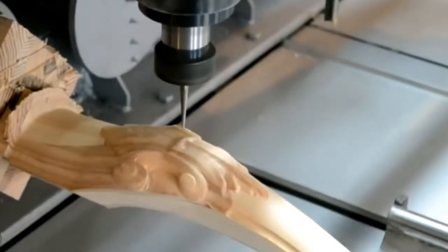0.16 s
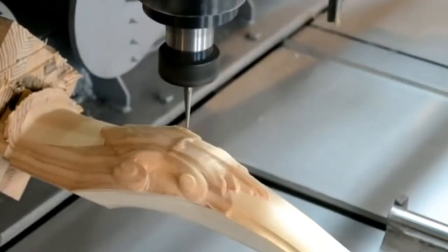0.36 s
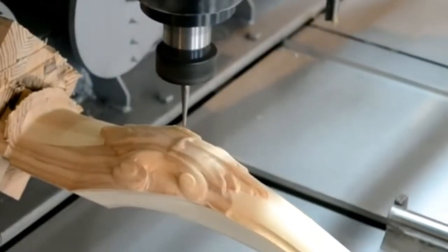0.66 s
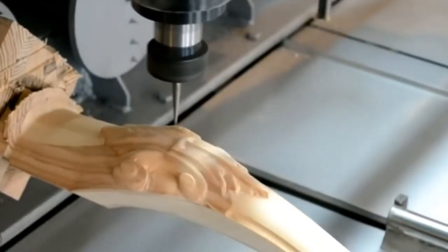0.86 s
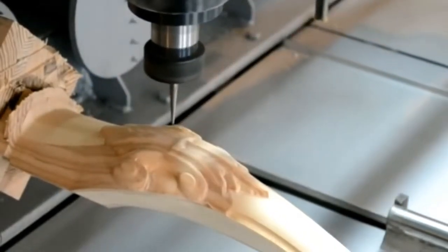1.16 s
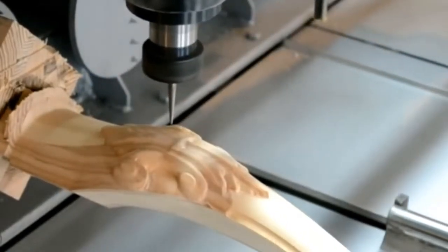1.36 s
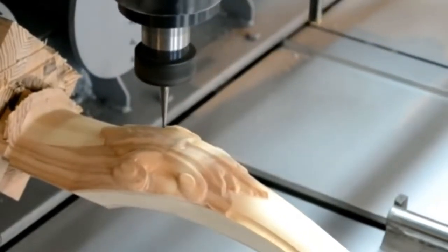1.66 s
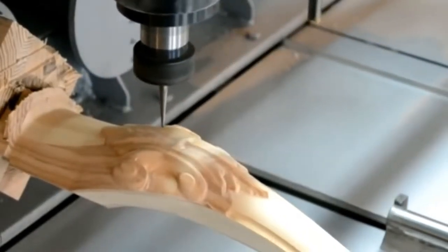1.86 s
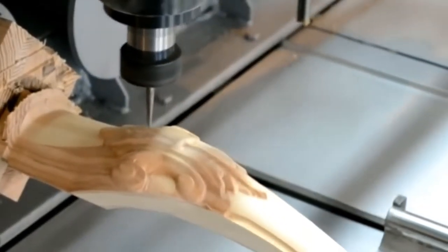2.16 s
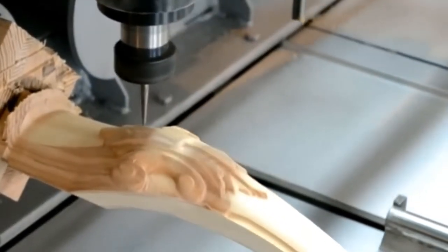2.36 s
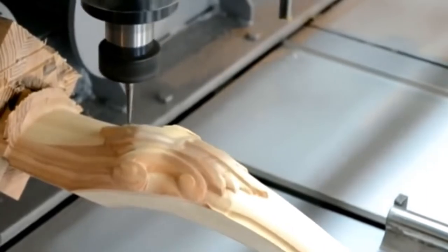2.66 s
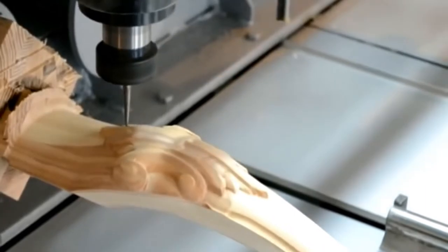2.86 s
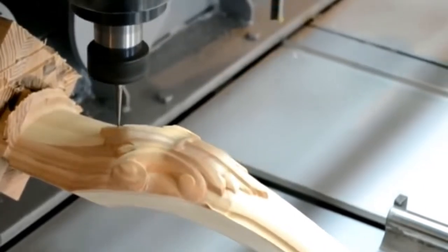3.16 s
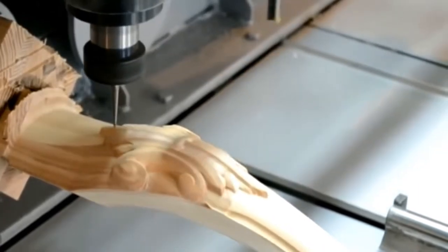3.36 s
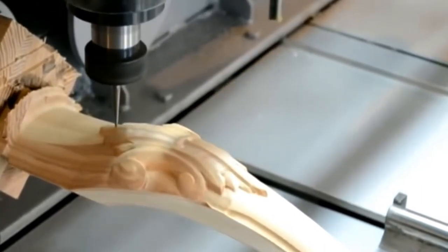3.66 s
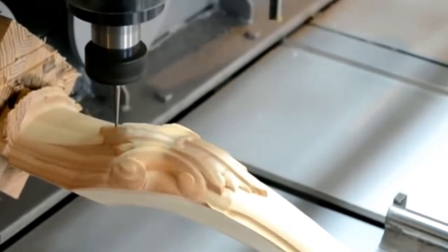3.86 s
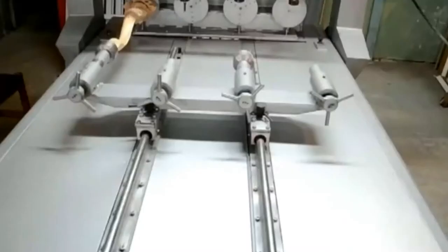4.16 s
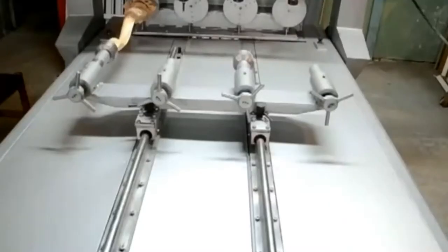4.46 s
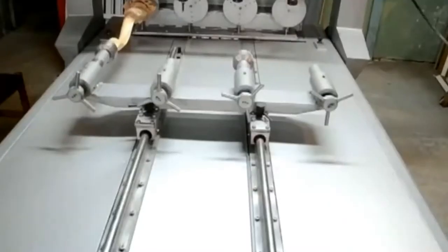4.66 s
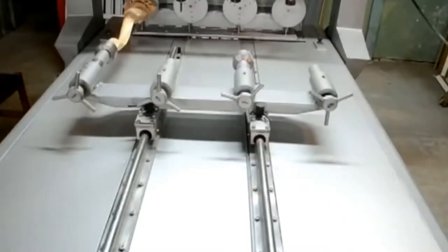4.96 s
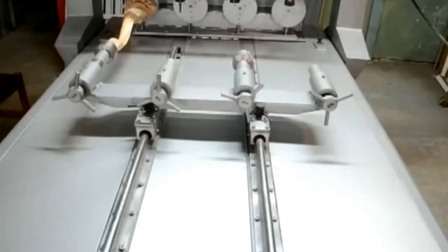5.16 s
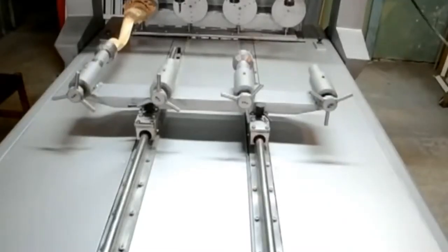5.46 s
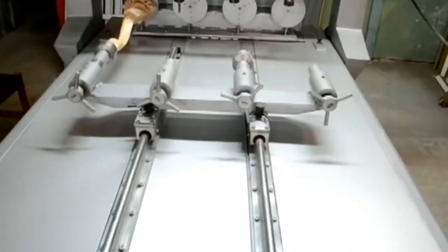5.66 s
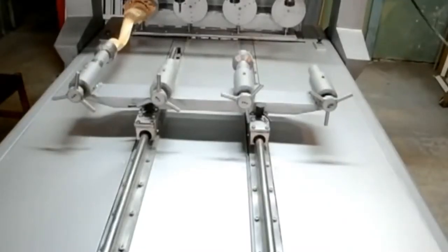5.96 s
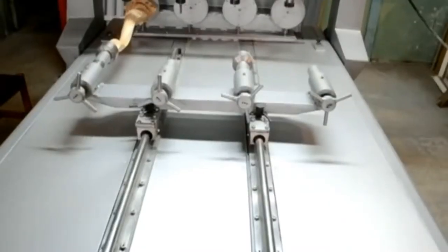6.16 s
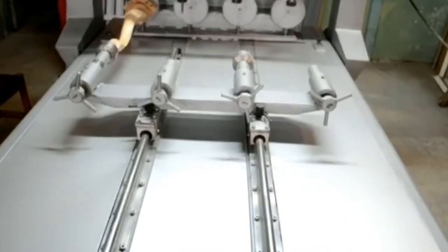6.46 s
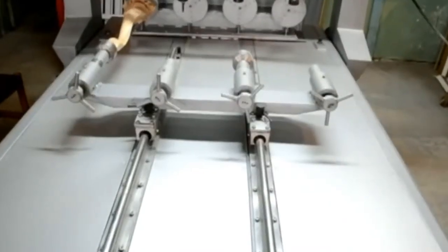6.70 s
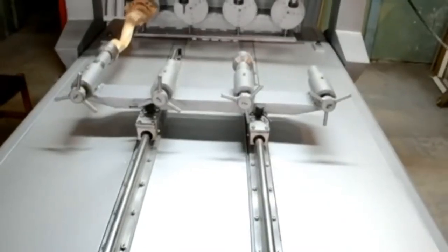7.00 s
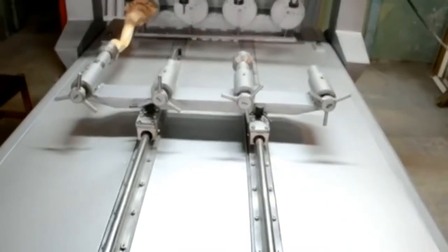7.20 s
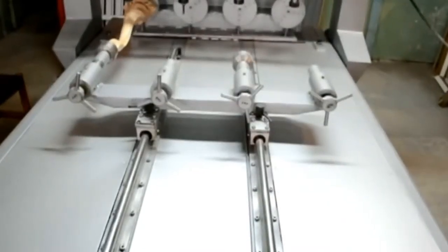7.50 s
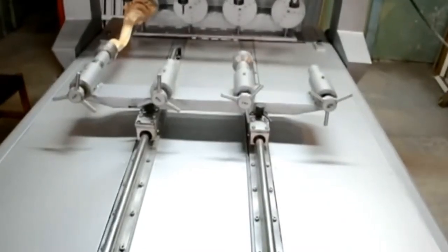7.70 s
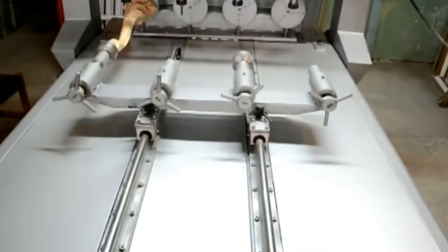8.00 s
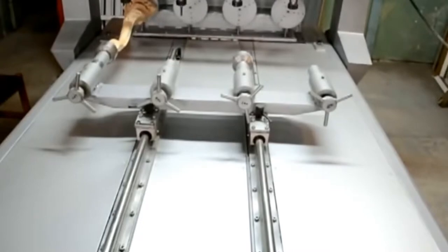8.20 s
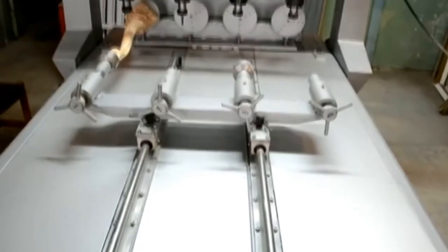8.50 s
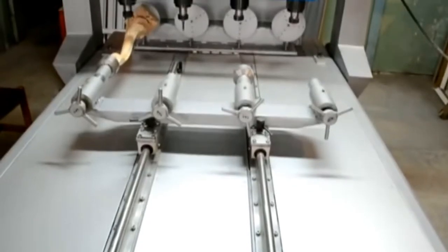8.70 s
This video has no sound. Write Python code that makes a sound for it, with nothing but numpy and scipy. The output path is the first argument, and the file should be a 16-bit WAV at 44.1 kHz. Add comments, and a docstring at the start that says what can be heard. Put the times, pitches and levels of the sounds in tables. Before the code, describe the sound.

A carving spindle whines and hisses steadily close by, cuts to brief silence, then continues duller and farther away before a sharp closing squeal.

```python
"""A carving machine's carriage rumbles and groans, then thuds once: rows of noise bursts, wavering tones, damped modes.
Close by, its spindle turns 299 times a second: sines at multiples of the speed whine and whistle over rushing noise.
From 2.2 s the cutter chatters in short chirps; half a second of silence follows at 4.2 s.
Then from the far end of the table the air is duller and a second spindle beats with the first.
At the end filtered noise spurts as air, and the head comes down with a squeal of throbbing, unsteady tones."""
import sys
import numpy as np
from scipy import signal
from scipy.fft import rfft, irfft, next_fast_len
from scipy.io import wavfile
from scipy.ndimage import uniform_filter1d, map_coordinates

SR = 44100
rng = np.random.default_rng(int(sys.argv[2]) if len(sys.argv) > 2 else 0)


def wav_record(signal):
    """Record a signal, one row per channel, as 16-bit PCM in the file named by sys.argv[1]."""
    frames = np.transpose(np.atleast_2d(signal))
    bounded = np.clip(frames, -1, 1)
    # unit amplitude maps onto the largest positive 16-bit level
    quanta = np.round(bounded * 32767).astype(np.int16)
    wavfile.write(sys.argv[1], SR, quanta)


N = 389844
TIME = np.arange(N) / SR  # s

# Turbulent air close by: f/Hz, relative spectral level/dB (per Hz)
NEAR_AIR_SPECTRUM = [(25, -47.5), (70, -31), (110, -28.5), (160, -24), (300, -16.5), (500, -14.5),
                     (1000, -6), (1600, 1), (2600, -2.5), (4300, -7), (6500, -7), (9000, -6),
                     (10400, -11.5), (15000, -36.5)]
# Resonances of housing and table, close by: f/Hz, width/Hz, lift/dB
NEAR_RESONANCES = [(530.5, 42, 10), (704.5, 270, 14), (1219, 82, 11), (1424, 188, 7.5), (1690, 28, 8),
                   (2118, 150, 5.5), (2544, 180, 4.5), (2740, 61, 5), (3080, 43, 5), (3190, 69, 6.5),
                   (3820, 450, 5), (4330, 26, 3.5), (5030, 350, 5.5), (5900, 60, 5.5)]
# Hum close by, as the head crosses the work: t/s, level/dB
NEAR_HUM_LEVEL = [(0, -32), (1.5, -27), (2.4, -27.5), (4.19, -31.5)]
# Fan whine close by: t/s, level/dB
NEAR_FAN_LEVEL = [(0.03, -19.5), (1.46, -17.5), (2.28, -21), (3.35, -16.5), (3.43, -17.5), (4.15, -18)]
# Other motors close by: beat f/Hz, t of a crest/s, level relative to the spindle's hum/dB
NEAR_MOTORS = [(1.156, 2.276, -11), (1.783, 2.286, -17.8)]


def spindle_near(turns, field):
    """Superposition beside the cutter: resonant air noise plus tones locked to rotor and field."""
    (hum_db,), (fan_db,) = curves(NEAR_HUM_LEVEL), curves(NEAR_FAN_LEVEL)
    # The rush fades by 0.24 dB/s as the head moves off
    air_db = -16 - 0.24 * TIME + 0.15 * wobble(7.3)
    out = amp(air_db) * air(turns, NEAR_AIR_SPECTRUM, NEAR_RESONANCES, chop=0.035, patchy_db=1.65)
    out += amp(hum_db) * hum(turns, NEAR_MOTORS, waver_db=0.5)
    out += whine(turns, fan_db, octave_db=-29.5, rough_db=0.76, smear=0.002, octave_rough_db=3.5)
    out += shaft_tones(turns, is_far=False, waver_db=1.8)
    return out + whistles_near(field)


# Turbulent air from afar: f/Hz, relative spectral level/dB (per Hz)
FAR_AIR_SPECTRUM = [(25, -44), (60, -34), (110, -28), (160, -21), (300, -13), (500, -9.5), (1000, -3.5),
                    (1600, 0.5), (2600, -2), (4300, -8.5), (6500, -11.5), (9000, -13), (10400, -17),
                    (15000, -44)]
# Resonances of housing and table, from afar: f/Hz, width/Hz, lift/dB
FAR_RESONANCES = [(711, 122, 8.5), (1190, 30, 2), (1440, 250, 7.5), (1994, 125, 5.8), (2600, 250, 4.3),
                  (3110, 92, 8.2), (3800, 130, 1.9), (4073, 55, 9.5), (4540, 87, 6.8), (7300, 47, 3.7)]
# Brief swells of the rush: start t/s, end t/s, added gain relative to the steady rush/dB
AIR_SWELLS = [(5.93, 6.0, -10), (8.2, 8.43, -13)]
# Fan whines from afar, before the closing drop: t/s, own fan level/dB, second spindle's fan level/dB
FAR_FAN_LEVELS = [(4.7, -38.2, -37.3), (5.2, -29.0, -34.4), (5.7, -38.4, -37.9), (6.3, -33.6, -35.3),
                  (7.0, -31.1, -28.7), (7.45, -23.5, -28.4), (8.05, -21.6, -27.8), (8.3, -22.8, -34.6),
                  (8.55, -18.6, -33.6)]
# Other motors from afar: beat f/Hz, t of a crest/s, level relative to the spindle's hum/dB
FAR_MOTORS = [(1.044, 7.158, -6.5), (1.666, 6.853, -12.5)]


def spindle_far(turns, field):
    """Superposition from afar: duller air and two beating fans, turned down 4.8 dB under the closing squeal."""
    fan_db, second_db = curves(FAR_FAN_LEVELS)
    flow = amp(-19) * (1 + bursts(AIR_SWELLS, attack_s=0.027, fall_db_per_s=134))
    out = flow * air(turns, FAR_AIR_SPECTRUM, FAR_RESONANCES, chop=0.025, patchy_db=1.7)
    out += amp(-36.5) * hum(turns, FAR_MOTORS, waver_db=1.3)
    out += whine(turns, fan_db, octave_db=-32.5, rough_db=1.5, smear=0.0022, octave_rough_db=1.0)
    out += amp(second_db) * second_fan(turns)
    out += shaft_tones(turns, is_far=True, waver_db=1.6)
    out += whistles_far(field)
    drop_start_s, glide_s, drop_db = 8.648, 0.055, -4.8
    return out * amp(drop_db * np.clip((TIME - drop_start_s) / glide_s, 0, 1))


def whine(turns, fan_db, octave_db, rough_db, smear, octave_rough_db):
    """Blade passing: eight blades in unsteady air sound the eighth multiple of rotation and its octave."""
    blades = turns + smear * wobble(45)
    fan = amp(fan_db + rough_db * wobble(70)) * tone(blades, order=8)
    # The octave gains 0.6 dB for each dB of the whine
    follow_db = 0.6 * (fan_db - fan_db.max())
    octave_level_db = octave_db + follow_db + octave_rough_db * wobble(60)
    return fan + amp(octave_level_db) * tone(blades, order=16)


def second_fan(turns):
    """Interference: a second spindle a shade faster sets its fan whine beating with the first."""
    beat_hz, crest_s = 5.62, 7.39
    return tone(8 * turns + beat_hz * (TIME - crest_s), order=1)


def air(turns, spectrum, modes, chop, patchy_db):
    """Turbulence: cooling air comes in patches; rotation chops its hiss once and twice a turn."""
    patches = signal.stft(rush(spectrum, modes), nperseg=1024)[2]
    eddies = uniform_filter1d(rng.standard_normal(patches.shape), size=2, axis=0)
    eddies = uniform_filter1d(eddies, size=3, axis=1)
    noise = signal.istft(patches * amp(patchy_db * unit(eddies)), nperseg=1024)[1][:N]
    # The hiss fades in between 1 and 2 kHz
    hiss = filtered(noise, lambda hz: np.clip(hz / 1000 - 1, 0, 1))
    pulsing = chop * (tone(turns, order=1) + tone(turns, order=2))
    return unit(noise + hiss * pulsing)


# Magnetic whistles: order (multiple of drive f), near level before/dB, near level after/dB, far level/dB
WHISTLE_TONES = [(18, -34.5, -42, -48), (19, -37.5, -52, -38), (21, -40.5, -32, -43),
                 (25, -61.5, -52.5, -52)]


def whistles_near(field):
    """Magnetic excitation: multiples of the drive frequency change balance as the head moves on."""
    # The balance starts a fifth of the way from "before" to "after"
    moved, = curves([(2.0, 0.2), (2.5, 1)])
    out = np.zeros(N)
    for order, before_db, after_db, _ in WHISTLE_TONES:
        level_db = before_db + (after_db - before_db) * moved + 1.0 * wobble(16)
        out += amp(level_db) * tone(field, order)
    return out


def whistles_far(field):
    """Magnetic excitation: the same multiples of the drive frequency at their balance from afar."""
    return sum(amp(db + 0.7 * wobble(11.0)) * tone(field, order) for order, _, _, db in WHISTLE_TONES)


def hum(turns, beats, waver_db):
    """Beating: a hum at twice the rotation swells and fades against motors a shade faster."""
    others = sum(amp(db) * tone(2 * turns + hz * (TIME - crest), order=1) for hz, crest, db in beats)
    return amp(waver_db * wobble(13)) * (tone(turns, order=2) + others)


# Weak shaft tones: order (multiple of shaft speed), near level/dB, far level/dB
SHAFT_TONES = [(1, -46.5, -46), (3, -62, -45), (4, -49, -39.5)]


def shaft_tones(turns, is_far, waver_db):
    """Harmonics of rotation: weak wavering sines at whole multiples of the shaft speed."""
    out = np.zeros(N)
    for order, near_db, far_db in SHAFT_TONES:
        level_db = far_db if is_far else near_db
        out += amp(level_db + waver_db * wobble(14)) * tone(turns, order)
    return out


# Cutter chatter: start t/s, end t/s, f/Hz, width/Hz, level/dB
CHATTER = [(2.19, 2.35, 4777, 14, -21), (3.45, 3.54, 4790, 23.5, -20), (4.85, 4.9, 4756, 23, -27),
           (5.12, 5.24, 4752, 30, -31.5), (6.57, 6.7, 4768, 24, -28)]


def cutter_chirps():
    """Chatter: the cutter sounds short, narrow-band tones of unsteady level."""
    return sing(CHATTER, rough_db=1.5)


# Tones of the squealing slide: f/Hz, width of wander/Hz, relative level/dB, throb depth/dB, full growth/dB
SLIDE_MODES = [(2659, 18, -23, -3.5, -2), (4450, 50, -46, 0, 14), (4642, 24, -20, 8, -2),
               (5150, 20, -38, 3, 10), (7108, 16, -14.5, 0, -12), (8420, 14, -25, 1, 4),
               (9390, 30, -42, 0, 12), (9710, 40, -31, 0, -12), (9910, 30, -38, 0, 1),
               (10990, 30, -35, 0, -2), (12320, 30, -43, 0, 3), (13050, 40, -56, 0, 0),
               (13620, 60, -56, 0, 0)]
# Short, weaker squeals first, then the full one: start t/s, end t/s, level/dB
SLIDE_SQUEALS = [(7.712, 7.735, -11), (8.195, 8.27, -13.5), (8.3, 8.63, -31), (8.642, 8.85, -1.5)]


def head_squeal(waver_db=3.0):
    """Modal sound of a slide: wandering tones throb together and trade strength."""
    progress, = curves([(8.69, 0.075), (8.84, 1)])
    throb_hz, null_s = 20.6, 8.711
    throb = 2 * np.abs(np.sin(np.pi * throb_hz * (TIME - null_s))) - 1.5
    squeal = np.zeros(N)
    for hz, width, db, throb_db, growth_db in SLIDE_MODES:
        cycles = np.cumsum(hz + width / 2 * wobble(120)) / SR
        level_db = db + throb_db * throb + growth_db * progress + waver_db * wobble(60)
        squeal += amp(level_db) * tone(cycles, order=1)
    return bursts(SLIDE_SQUEALS, attack_s=0.02, fall_db_per_s=250) * squeal


# Compressed air spurting and leaking from a valve: start t/s, end t/s, level/dB
VALVE_SPURTS = [(8.187, 8.26, -17), (8.3, 8.63, -35), (8.645, 8.675, -26)]
# Spurting air: f/Hz, relative spectral level/dB (per Hz)
SPURT_SPECTRUM = [(40, -55), (200, -24), (700, -1.5), (2500, -0.5), (5000, -3), (7000, -4), (9500, -8),
                  (14500, -33.5)]


def air_spurts():
    """Jet noise: compressed air leaves a valve as short, flickering bursts of broadband noise."""
    gusts = bursts(VALVE_SPURTS, attack_s=0.014, fall_db_per_s=150)
    return gusts * amp(0.8 * wobble(90)) * rush(SPURT_SPECTRUM)


# Carriage travels: start t/s, end t/s, rumble level/dB
CARRIAGE_TRAVELS = [(0, .15, -42.5), (0.175, 0.34, -26.5), (4.7, 4.85, -45), (7.74, 8.62, -40)]
# Rumble: f/Hz, relative spectral level/dB (per Hz)
RUMBLE_SPECTRUM = [(30, -44.5), (90, -33.5), (180, -4), (310, -3), (450, -2), (800, -5.5), (2000, -33),
                   (6000, -76)]
# Groans of the axis drives: start t/s, end t/s, f/Hz, width/Hz, level/dB
AXIS_GROANS = [(0.0, 0.196, 316, 49, -34.5), (4.72, 5.06, 153.4, 21, -50.5)]
# Frame modes rung by the jolt: f/Hz, starting level/dB, 60 dB decay time/s
FRAME_MODES = [(123, -31, .08), (186, -22, 0.15), (318, -17, 0.13), (702, -17, 0.15)]


def carriage():
    """Impulse response: one jolt rings the frame's damped modes as the axes rumble and groan."""
    rumble = bursts(CARRIAGE_TRAVELS, attack_s=0.019, fall_db_per_s=75) * rush(RUMBLE_SPECTRUM)
    jolt_s, attack_s = 0.186, 0.0027
    t = np.maximum(TIME - jolt_s, 0)
    thud = sum(amp(db - 60 * t / t60) * np.sin(2 * np.pi * hz * t) for hz, db, t60 in FRAME_MODES)
    return rumble + sing(AXIS_GROANS, rough_db=4.5) + thud * (1 - np.exp(-t / attack_s))


def sing(rows, rough_db):
    """Frequency and amplitude modulation: unsteady tones swell and die, one for each row."""
    out = np.zeros(N)
    for on, off, hz, width, db in rows:
        swell = np.sqrt(np.interp(TIME, [on, (on + off) / 2, off], [0, 1, 0]))
        cycles = np.cumsum(hz + width / 2 * wobble(60)) / SR
        out += amp(db + rough_db * wobble(40)) * swell * tone(cycles, order=1)
    return out


def bursts(rows, attack_s, fall_db_per_s):
    """Envelope: the gain of each (start, end, dB) row rises linearly, holds and decays exponentially."""
    gain = np.zeros(N)
    for on, off, db in rows:
        attack = np.clip((TIME - on) / attack_s, 0, 1)
        gain += attack * amp(db - fall_db_per_s * np.maximum(TIME - off, 0))
    return gain


def rotation(hz, drift):
    """Phase as the integral of speed: turns made so far at a slightly unsteady rate."""
    return np.cumsum(hz * (1 + drift * wobble(5))) / SR


def tone(turns, order):
    """Harmonic motion: a sine of rms 1 at a whole multiple of a rotation."""
    return np.sqrt(2) * np.sin(2 * np.pi * order * turns)


def rush(spectrum, modes=()):
    """Spectral shaping: white noise takes a broad spectrum and resonances, scaled to rms 1."""
    length = next_fast_len(N, True)
    f, db = np.transpose(spectrum)
    hz = np.fft.rfftfreq(length, 1 / SR)
    colour = amp(np.interp(np.log(hz + 1), np.log(f), db) + bumps(modes, hz))
    return unit(irfft(colour * rfft(rng.standard_normal(length)))[:N])


def bumps(modes, hz):
    """Resonance curves: the dB that a set of resonances or notches adds at each frequency."""
    return sum(db / (1 + (2 * (hz - centre) / width) ** 2) for centre, width, db in modes)


def filtered(x, response):
    """Linear filtering: the spectrum of x is multiplied by a response of frequency."""
    m = next_fast_len(N + 8192)
    return irfft(rfft(x, m) * response(np.fft.rfftfreq(m, 1 / SR)), m)[..., :N]


def wobble(rate):
    """Random modulation: a smooth curve through random knots, rate knots a second."""
    return map_coordinates(rng.standard_normal(int(N * rate / SR) + 4), [TIME * rate])


def curves(rows):
    """Linear interpolation: one value per sample for each column after the time."""
    s, *cols = np.transpose(rows)
    return [np.interp(TIME, s, c) for c in cols]


def unit(x):
    """Normalisation to rms 1."""
    return x / np.sqrt(np.mean(np.abs(x) ** 2) + 1e-20)


def amp(db):
    """Logarithmic level: decibels to amplitude gain."""
    return 10 ** (np.asarray(db) / 20)


def scene():
    """Induction slip: the rotor lags its driving field; silence parts the two positions."""
    turns = rotation(hz=298.96, drift=0.00021)
    field = rotation(hz=300.03, drift=0.00004)
    machine = cutter_chirps() + head_squeal() + air_spurts() + carriage()
    near_end_s, far_start_s = 4.195, 4.695
    near = (spindle_near(turns, field) + machine) * (TIME < near_end_s)
    far = (spindle_far(turns, field) + machine) * (TIME > far_start_s)
    return np.array([near + far] * 2)


def record(dry):
    """Frequency response of a mono microphone: two treble notches and a steep band limit."""
    notches = [(7940, 380, -8.5), (11660, 730, -30.5)]  # f/Hz, width/Hz, level/dB
    top_hz = 15200
    return filtered(dry, lambda hz: amp(bumps(notches, hz)) * np.clip((top_hz - hz) / 100, 0, 1))


dry = scene()
out = record(dry)
wav_record(out)
```